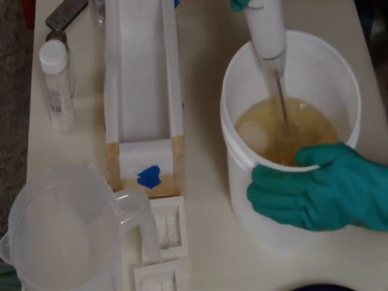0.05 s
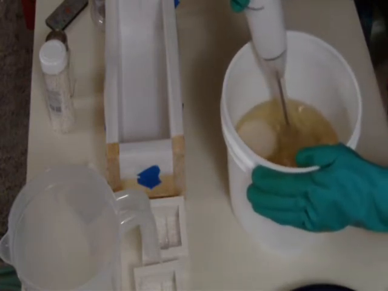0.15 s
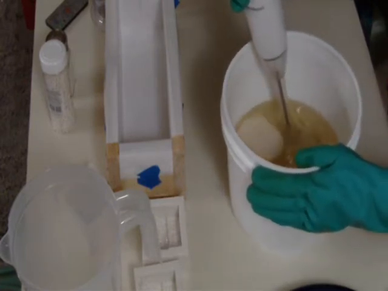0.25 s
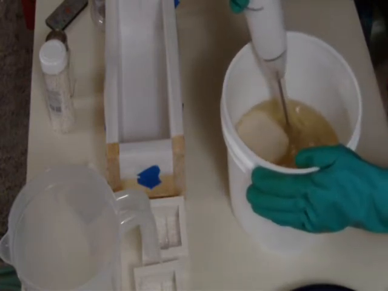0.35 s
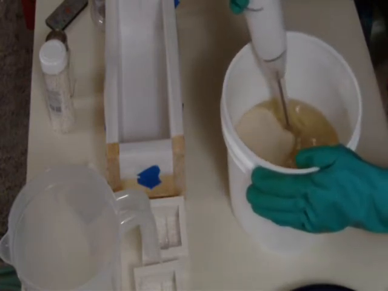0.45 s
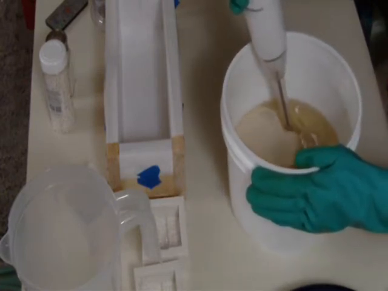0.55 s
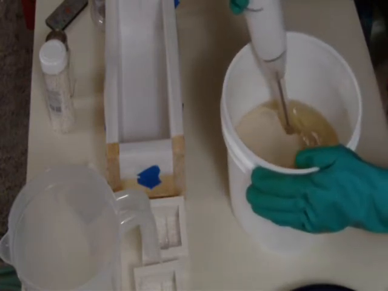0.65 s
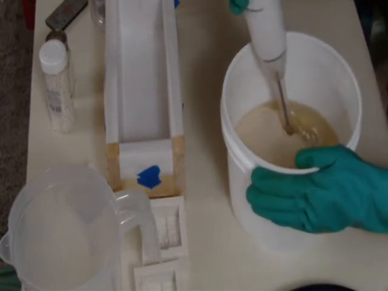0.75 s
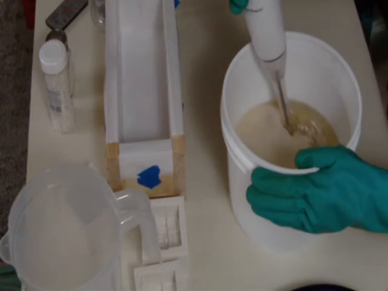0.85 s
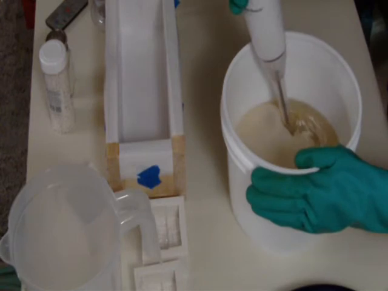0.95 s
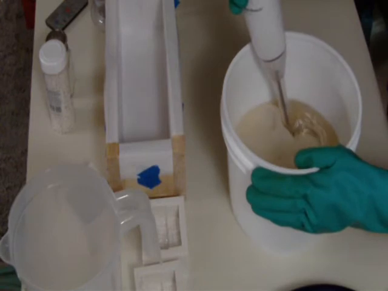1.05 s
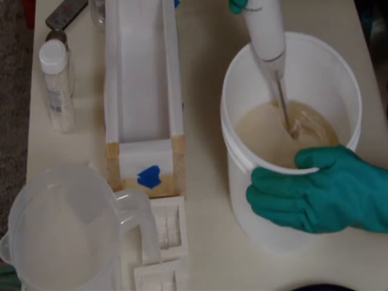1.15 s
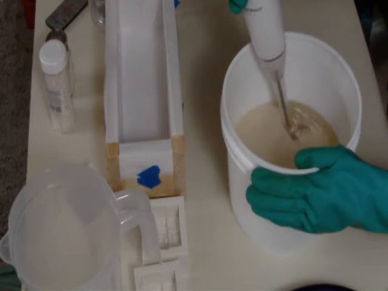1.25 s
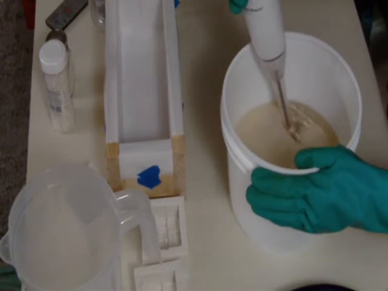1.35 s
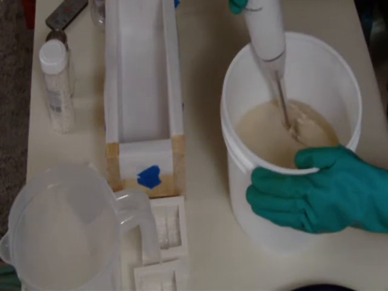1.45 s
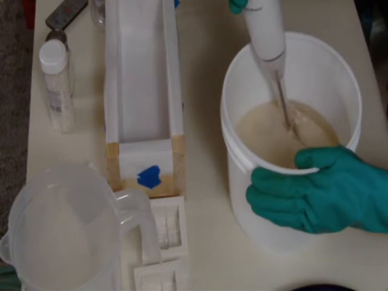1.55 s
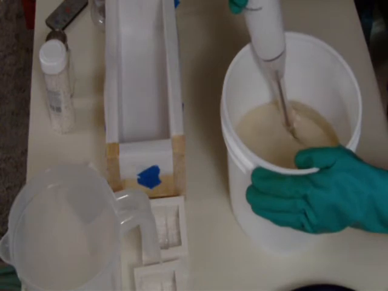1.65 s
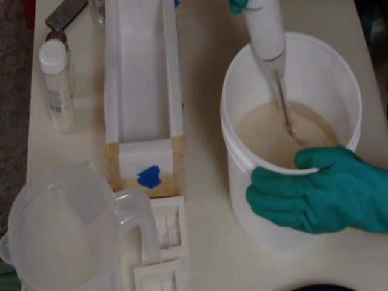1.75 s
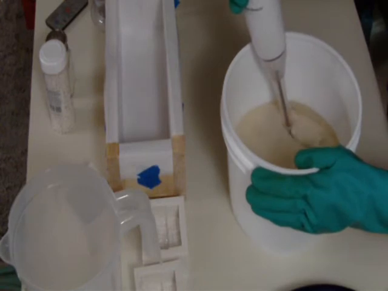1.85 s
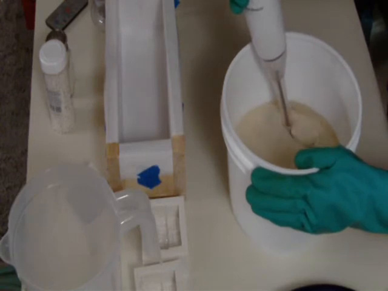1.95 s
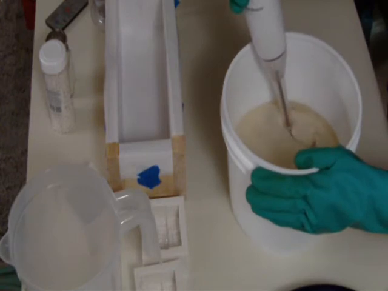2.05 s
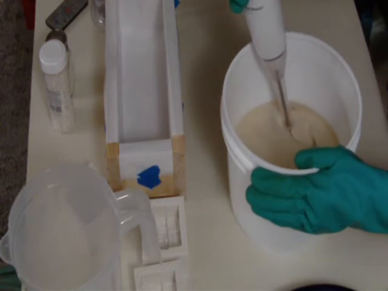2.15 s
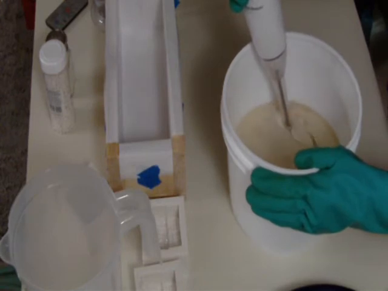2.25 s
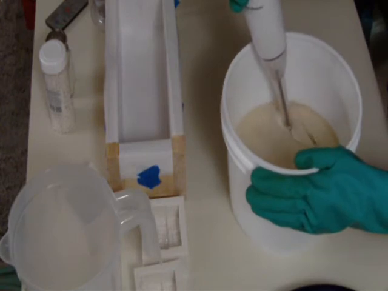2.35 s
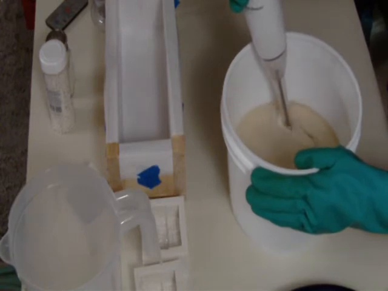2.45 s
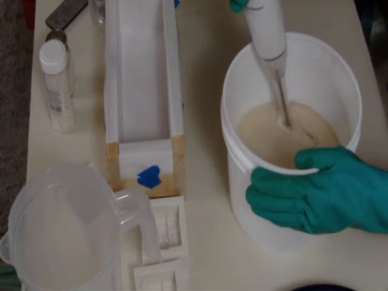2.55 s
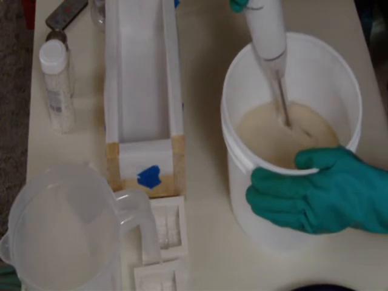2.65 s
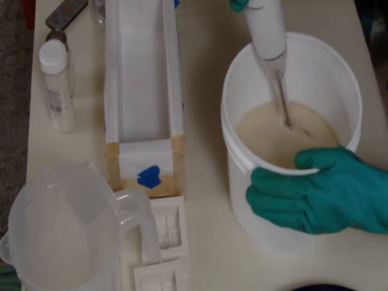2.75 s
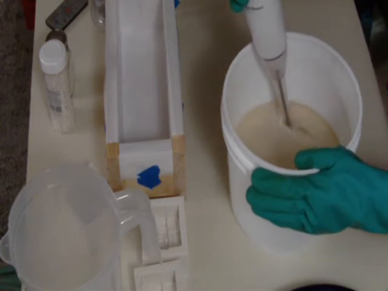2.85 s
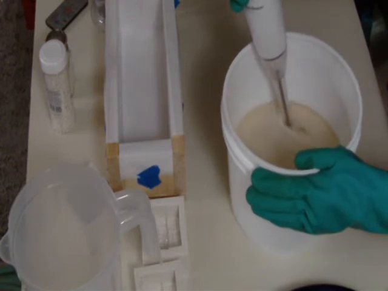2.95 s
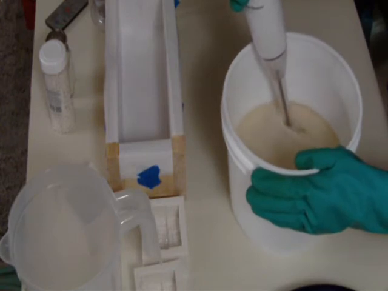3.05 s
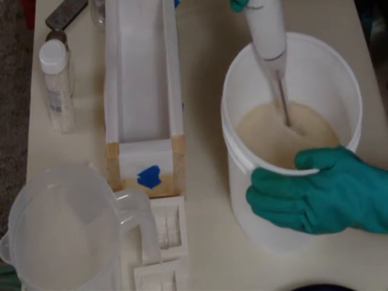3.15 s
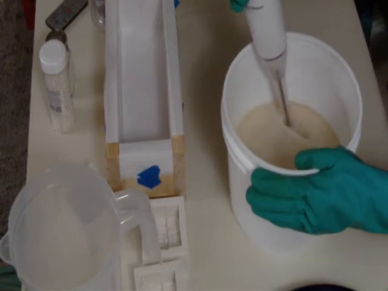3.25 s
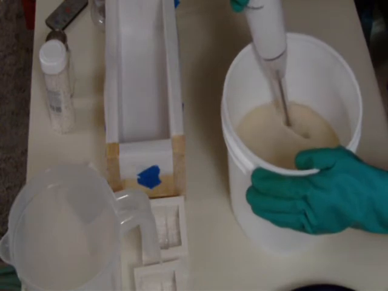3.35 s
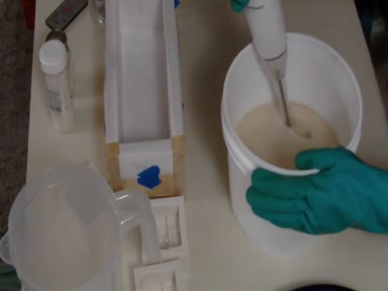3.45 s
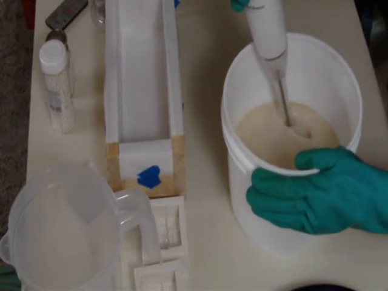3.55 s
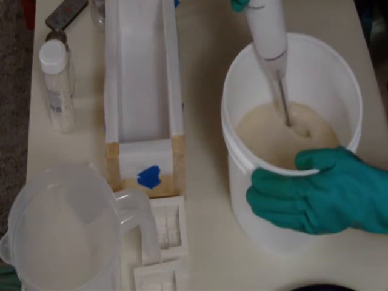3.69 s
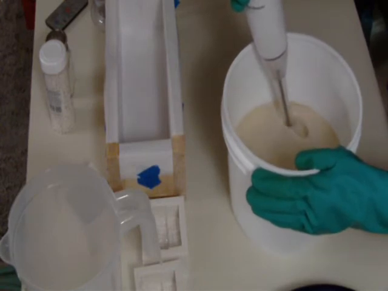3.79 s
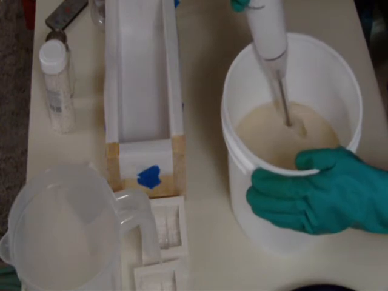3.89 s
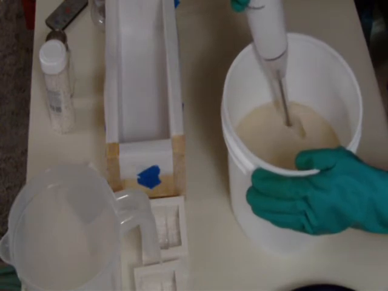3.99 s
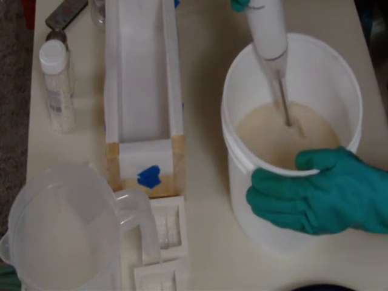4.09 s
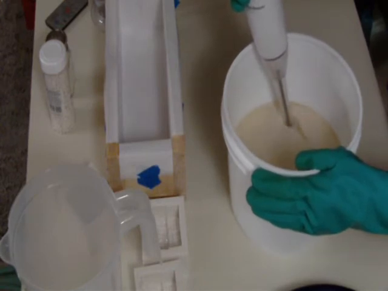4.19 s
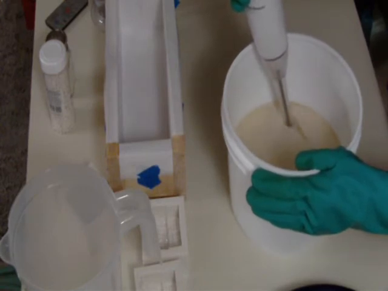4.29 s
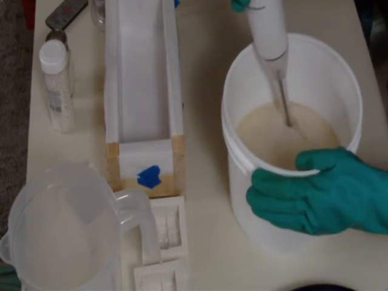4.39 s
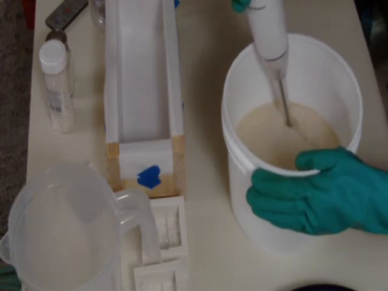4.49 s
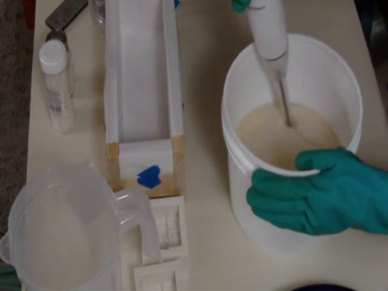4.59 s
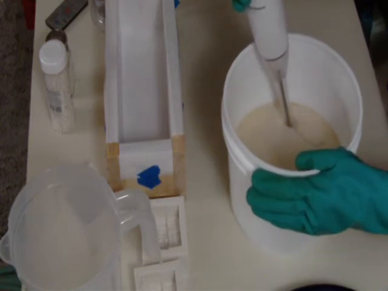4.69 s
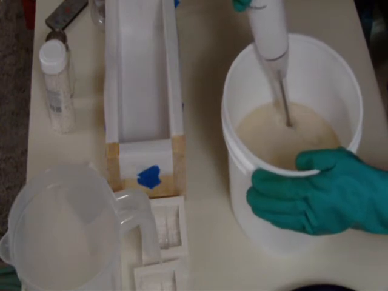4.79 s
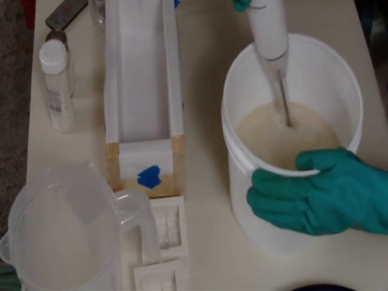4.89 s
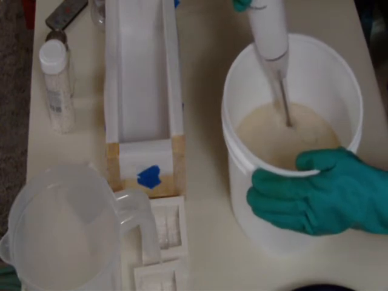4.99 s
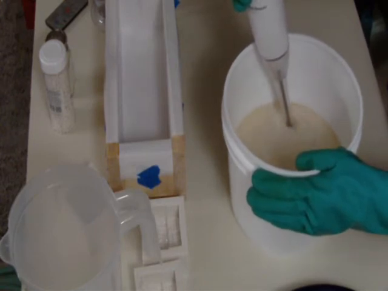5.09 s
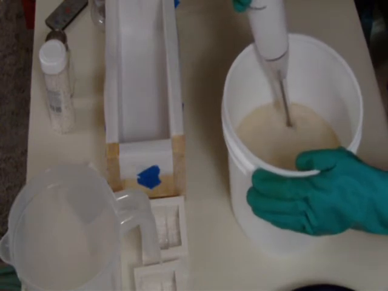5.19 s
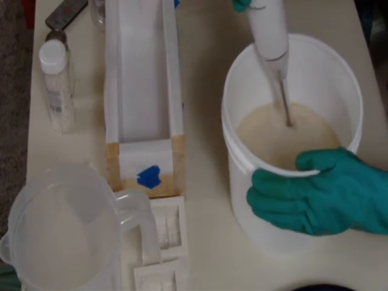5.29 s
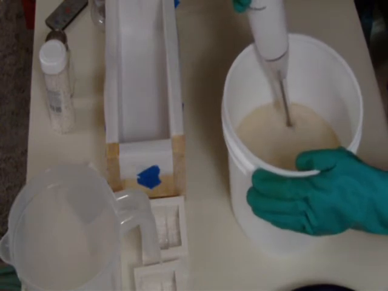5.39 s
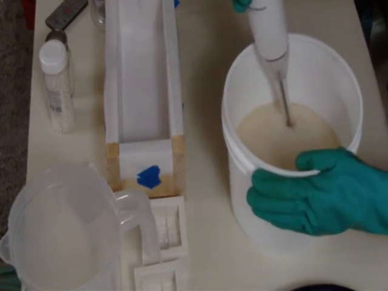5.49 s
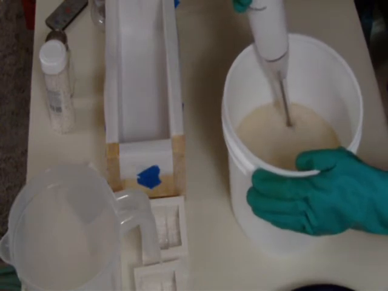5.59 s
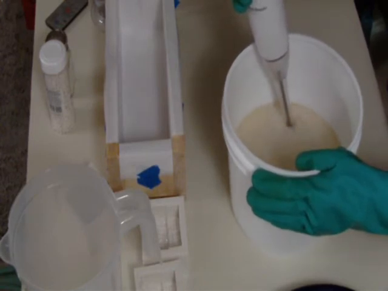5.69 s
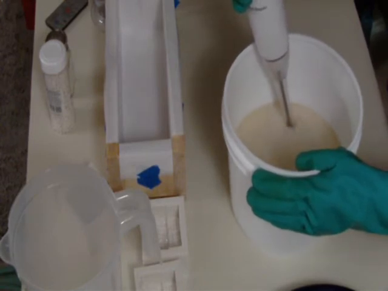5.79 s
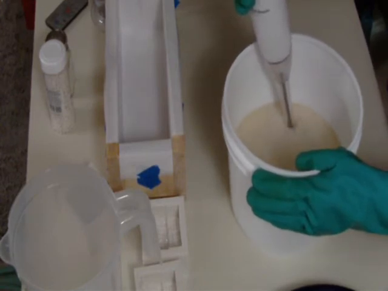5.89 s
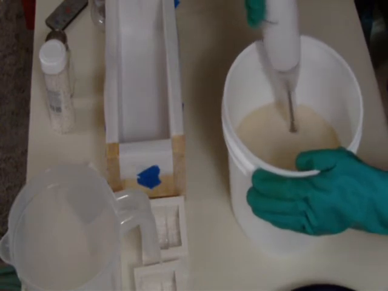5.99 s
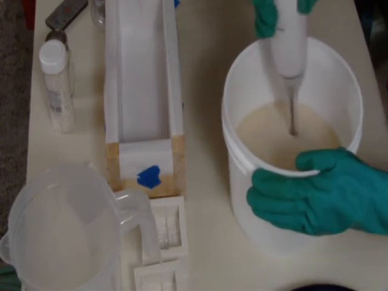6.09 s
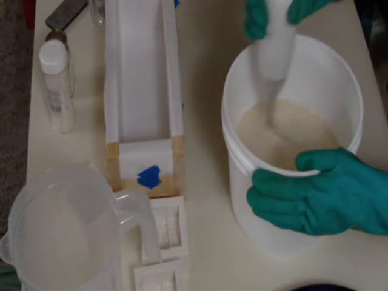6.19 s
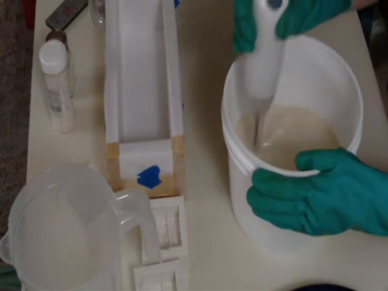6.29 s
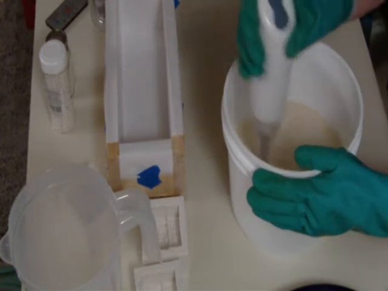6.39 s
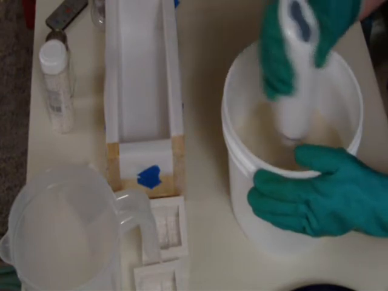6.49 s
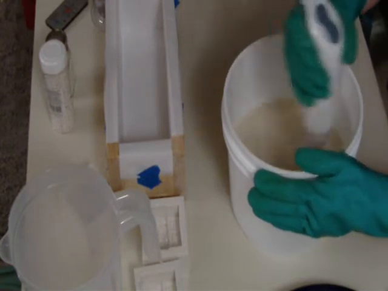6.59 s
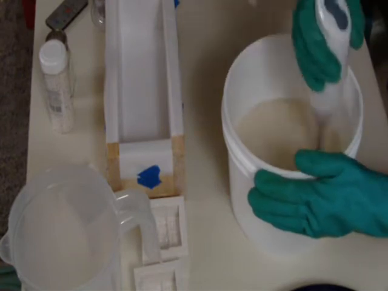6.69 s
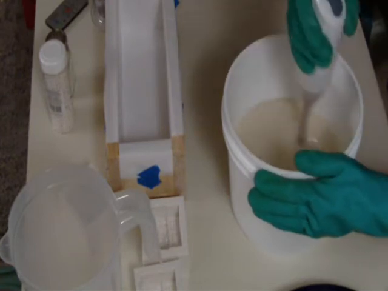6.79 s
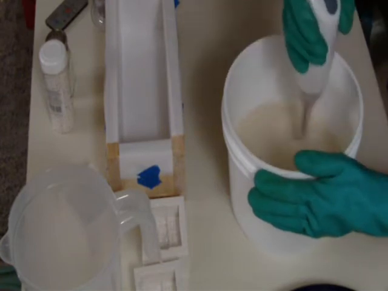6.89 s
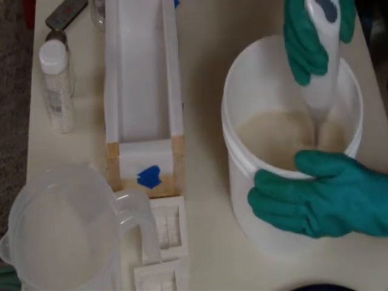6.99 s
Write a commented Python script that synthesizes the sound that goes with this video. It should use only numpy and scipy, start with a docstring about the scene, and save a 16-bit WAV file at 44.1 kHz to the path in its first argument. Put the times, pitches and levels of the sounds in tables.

```python
"""Stick blender in a bucket

A stick blender mixes oils in a plastic bucket on a workbench, in a small room; both channels are equal.
Mains pulses ripple the motor speed: the rotor hums on shaft orders, the commutator whines, the brushes hiss.
The churned liquid is random bubble bursts, coloured and passed through the bucket's resonances.
Switched off, the motor coasts to rest with a squeak; the head scrapes and knocks the bucket,
then stirs the batter by hand: soft swells of bubble noise.
"""
import sys
import numpy as np
from scipy import signal
from scipy.fft import rfft, irfft, next_fast_len
from scipy.io import wavfile
from scipy.ndimage import map_coordinates

SR = 44100
rng = np.random.default_rng(int(sys.argv[2]) if len(sys.argv) > 2 else 0)


def waveform_to_disk(signal):
    """Save audio, clipped to [-1, 1], as 16-bit WAV at the path in sys.argv[1]."""
    frames = np.transpose(np.atleast_2d(signal))
    scaled = np.clip(frames, -1, 1) * 32767
    samples = np.round(scaled).astype(np.int16)
    wavfile.write(sys.argv[1], SR, samples)


N = 310287
TIME = np.arange(N) / SR   # s
MAINS_HZ, CUTOFF_HZ = 60.02, 15650
# end of power, time constant of the drag, time from power off to standstill
SWITCH_OFF_S, DRAG_S, COAST_S = 5.762, .21, .53
# constant lapping of the batter under the strokes, relative levels
LAP_GURGLE_DB, LAP_FIZZ_DB = -48.5, -61

# room air colour: [freq_hz, density_db_per_hz]
ROOM_AIR_COLOUR = [(15, -54), (25, -32), (116, -17), (164, 8), (215, 4), (260, -2), (322, -3), (537, 12.5),
                   (1240, -20), (1530, -48), (2560, -19), (4620, -8), (15500, -19)]
# steady room hum: [freq_hz, level_db]
ROOM_HUM_TONES = [(172.3, -70), (263.8, -64), (7887, -82)]
# air and wall resonances of the bucket: [freq_hz, width_hz, lift_db]
BUCKET_MODES = [(579, 63, 8), (820, 79, 7), (1213, 93, 7.5), (2050, 210, 2.5), (2635, 50, 4.5)]
# bell-shaped blade guard resonances: [freq_hz, width_hz, lift_db]
GUARD_MODES = [(2310, 180, 6), (2560, 160, 8)]
# motor housing resonances: [freq_hz, width_hz, lift_db]
HOUSING_MODES = [(2330, 120, 13), (3920, 180, 13.5), (5460, 134, 8), (7030, 510, 10), (8740, 290, 10),
                 (9750, 350, 11.5), (10444, 140, 15.5), (14500, 220, 14.5)]
# bench and bucket ringing driven by the rotor: [freq_hz, width_hz, lift_db]
SUPPORT_MODES = [(120, 13, 10.5), (304.2, 26, 13), (588.5, 49, 12)]
# idle head through the batter: [middle_s, length_s, relative_gurgle_db, relative_fizz_db]
STIR_STROKES = [(6.19, 0.12, -50, -49), (6.362, .15, -55, -54), (6.55, 0.15, -56, -53.5),
                (6.74, 0.09, -55, -47.5), (6.938, 0.066, -44.5, -52.5), (7.018, 0.063, -53, -56)]
# stirred batter colour: [freq_hz, density_db_per_hz]
FIZZ_COLOUR = [(700, -19), (1400, -19), (1900, 1), (2450, 1.5), (3000, -3), (4000, -11), (6000, -20.5),
               (9000, -28), (16000, -40)]
# guard along the bucket wall: [middle_s, length_s, level_db]
GUARD_SCRAPE = (6.16, .1, -48)
# blender head against the bucket: [start_s, relative_peak_db]
HEAD_KNOCKS = [(6.119, -37), (6.146, -28.5), (6.206, -42)]
# brush squeak near standstill: [middle_s, length_s, level_db]
BRUSH_SQUEAK = (6.058, .05, -49.5)
# brush hiss colour: [freq_hz, density_db_per_hz]
BRUSH_COLOUR = [(2500, -19), (4500, 2), (6600, 3), (7900, -5.5), (9700, 3), (10900, 5), (11400, -6),
                (12600, -2.5), (13500, -5), (15800, -24.5)]
# commutator overtone colour: [freq_hz, relative_level_db]
WHINE_COLOUR = [(600, -40), (1700, -13), (3500, -3), (4400, -4), (5300, -0.5), (6200, 0), (7200, -2),
                (7900, 8), (8900, 0), (10200, 2.5), (11200, -3), (12500, -4), (15800, -13)]
# vortex strength at the blade: [time_s, relative_gurgle_db, relative_spray_db]
VORTEX_LEVELS = [(0.0, -32, -34), (0.05, -36, -39.5), (0.09, -37, -36), (0.26, -35.5, -34),
                 (0.42, -38.5, -34.5), (0.57, -35, -33.5), (0.93, -39, -36.5), (2.47, -37.5, -34.5),
                 (3.25, -36.5, -32.5), (3.41, -34, -32.5), (3.68, -38, -34), (4.32, -34.5, -34.5),
                 (4.61, -37, -34), (5.33, -36.5, -32.5), (5.52, -36.5, -33), (5.75, -35, -33.5)]
# bubble gurgle colour: [freq_hz, density_db_per_hz]
GURGLE_COLOUR = [(40, -22), (150, -25.5), (320, -9), (470, -9), (700, -2), (1000, -1), (1400, -1),
                 (1900, -3), (3500, -35)]
# spray colour: [freq_hz, density_db_per_hz]
SPRAY_COLOUR = [(700, -25), (1300, -9.5), (1750, 1), (2300, -2), (3400, -3.5), (4100, -9.5), (5200, -14.5),
                (6200, -27), (8000, -23), (16000, -30)]
# mean rotor speed under power, sagging as the blade takes up load: [time_s, turns_per_s]
ROTOR_SPEED = [(0, 152.1), (.45, 149.9), (.8, 148.7), (1.2, 148), (1.9, 148.1), (2.6, 149.1), (3.6, 148.6),
               (4.2, 149.1), (5.7, 148.8)]
# shake passed to the bucket: [time_s, relative_twice_per_turn_db, relative_four_per_turn_db]
BUCKET_SHAKE = [(0.0, -35, -34), (0.06, -41.5, -56), (0.17, -39, -48), (0.32, -42.5, -40.5),
                (0.86, -46, -34), (1.76, -46, -35), (2.4, -42, -40), (3.89, -41, -40), (4.0, -40.5, -44.5),
                (4.47, -41, -43), (4.8, -41.5, -36), (5.03, -41, -40), (5.52, -42, -38), (5.75, -39, -40.5)]
# weaker rotor orders, before support resonances: [multiple_of_turn, relative_level_db]
ROTOR_ORDERS = [(1, -56.5), (3, -52.5), (5, -47), (6, -48.5), (7, -52), (8, -45.5), (9, -56), (10, -47),
                (12, -65.5), (14, -61), (16, -69), (18, -54)]
# torque tones one mains rate above an order: [multiple_of_turn, relative_level_db]
TORQUE_TONES = [(2, -62.5), (3, -56.5), (4, -53)]


def from_db(db):
    """Decibels to amplitude gain."""
    return 10 ** (np.asarray(db) / 20)


def rms_one(x):
    """Scale to rms 1."""
    return x / np.sqrt(np.mean(x ** 2) + 1e-20)


def in_time(rows):
    """Interpolate each column of a time table to every sample."""
    time_s, *columns = np.transpose(rows)
    return [np.interp(TIME, time_s, column) for column in columns]


def swell(middle_s, length_s):
    """Smooth rise and fall; length is the width at half height."""
    return 2 ** -np.minimum((2 * (TIME - middle_s) / length_s) ** 2, 60)


def white():
    """White noise."""
    return rng.standard_normal(N)


def coloured(x, spectrum):
    """Shape a noise by gains interpolated over log frequency; rms 1."""
    table_hz, table_db = np.transpose(spectrum)
    size = next_fast_len(N)
    bins_hz = np.maximum(np.arange(size // 2 + 1) * SR / size, 1)
    gain = from_db(np.interp(np.log(bins_hz), np.log(table_hz), table_db))
    return rms_one(irfft(rfft(x, size) * gain, size)[:N])


def drift(rate_hz):
    """Smooth random drift of rms 1, from two random points per 1/rate_hz."""
    coarse_s = TIME[::32]
    points = rng.standard_normal(4096)
    smooth = map_coordinates(points, [coarse_s * 2 * rate_hz], order=3, mode="wrap")
    return np.interp(TIME, coarse_s, rms_one(smooth))


def grains(per_s, spread_db):
    """Bubble bursts or slips: impulses of uneven size and either sign at random moments; rms 1."""
    sizes = from_db(spread_db * np.minimum(rng.exponential(1, N), 4)) * np.sign(white())
    return rms_one(sizes * (rng.random(N) < per_s / SR))


def resonance(x, hz, width_hz):
    """Two-pole resonance, gain about 1 at its peak."""
    radius = np.exp(-np.pi * width_hz / SR)
    zeros = np.array([1, 0, -1]) * (1 - radius * radius) / 2
    poles = [1, -2 * radius * np.cos(2 * np.pi * hz / SR), radius * radius]
    return signal.lfilter(zeros, poles, x + 1e-18)


def lifted(x, modes):
    """A body lifts its resonances out of whatever sounds in it."""
    return x + sum((from_db(lift_db) - 1) * resonance(x, hz, width_hz) for hz, width_hz, lift_db in modes)


def bucket(x):
    """Air and wall resonances colour sound made inside the bucket."""
    return lifted(x, BUCKET_MODES)


def room(x, wet_db, t60_s):
    """Direct sound plus dense reflections, a decaying noise tail of set energy."""
    t = TIME[:SR // 2]
    tail = rng.standard_normal(len(t)) * from_db(-60 * t / t60_s)
    tail *= t > .003
    reflections = signal.fftconvolve(x, tail / np.linalg.norm(tail))[:N]
    return x + from_db(wet_db) * reflections


def background(air_db=-60):
    """Soft coloured room air and hum tones whose levels drift."""
    hum = np.zeros(N)
    for hz, db in ROOM_HUM_TONES:
        hum += np.sqrt(2) * from_db(db) * (1 + 0.17 * drift(5.7)) * np.sin(2 * np.pi * hz * TIME)
    return hum + from_db(air_db) * coloured(white(), ROOM_AIR_COLOUR)


def stirring(gurgle_db=-5.0, fizz_db=-3.0):
    """The idle head drags through thick batter: bubble noise laps steadily and swells per stroke."""
    gurgle_gain, fizz_gain = from_db(LAP_GURGLE_DB), from_db(LAP_FIZZ_DB)
    for middle_s, length_s, stroke_gurgle_db, stroke_fizz_db in STIR_STROKES:
        stroke = swell(middle_s, length_s)
        gurgle_gain = gurgle_gain + from_db(stroke_gurgle_db) * stroke
        fizz_gain = fizz_gain + from_db(stroke_fizz_db) * stroke
    gurgle = rms_one(bucket(coloured(grains(2500, 2.0), GURGLE_COLOUR)))
    fizz = coloured(grains(3000, 1.7), FIZZ_COLOUR)
    batter = from_db(gurgle_db) * gurgle_gain * gurgle + from_db(fizz_db) * fizz_gain * fizz
    return batter * np.clip((TIME - SWITCH_OFF_S) / DRAG_S, 0, 1)


def scrape(slips_per_s=3000, spread_db=3.0):
    """The guard sticks and slips on the plastic; each slip rings it."""
    middle_s, length_s, level_db = GUARD_SCRAPE
    slips = grains(slips_per_s, spread_db)
    ringing = sum(from_db(db) * resonance(slips, hz, width_hz) for hz, width_hz, db in GUARD_MODES)
    return from_db(level_db) * swell(middle_s, length_s) * rms_one(ringing)


def knocks(level_db=-5.5, t60_s=0.048, low_hz=750, high_hz=3000, top_hz=4800):
    """Plastic meets plastic: short noise cracks, damped by the liquid, ring bucket and guard."""
    decay = np.zeros(N)
    for start_s, peak_db in HEAD_KNOCKS:
        age_s = TIME - start_s
        decay += from_db(peak_db - 60 * np.abs(age_s) / t60_s) * (age_s >= 0)
    band = signal.butter(1, [low_hz, high_hz], "band", fs=SR, output="sos")
    top = signal.butter(2, top_hz, fs=SR, output="sos")
    noise = rms_one(signal.sosfilt(top, signal.sosfilt(band, white())))
    return from_db(level_db) * lifted(bucket(decay * noise), GUARD_MODES)


def mains_angle():
    """Mains phase in radians; power ends at pi/3, within a positive half cycle."""
    return 2 * np.pi * MAINS_HZ * (TIME - SWITCH_OFF_S) + np.pi / 3


def rotation(ripple=0.029, skew=0.2, wander=0.00063):
    """Shaft angle and relative pace: mains pulses ripple the speed; drag and friction stop the coast."""
    speed_turns_per_s, = in_time(ROTOR_SPEED)
    coasted_s = np.clip(TIME - SWITCH_OFF_S, 0, COAST_S)
    friction = np.exp(-COAST_S / DRAG_S)
    pace = np.maximum(np.exp(-coasted_s / DRAG_S) - friction, 0) / (1 - friction)
    mains = mains_angle()
    kick = (np.sin(mains) + skew * np.sin(2 * mains)) * (TIME < SWITCH_OFF_S)
    unevenness = 1 + ripple * kick + wander * drift(15)
    turns = np.cumsum(speed_turns_per_s * pace * unevenness) / SR
    return 2 * np.pi * turns, pace


def load(pace, knee, fade):
    """Gain that holds while the shaft is above the knee pace, then falls as a power of pace."""
    return np.minimum(pace / knee, 1) ** fade


def squeak(hz=3950, width_hz=190):
    """Slowly sliding carbon sticks and slips, ringing one housing mode: noise twice through a resonance."""
    middle_s, length_s, level_db = BRUSH_SQUEAK
    ringing = resonance(resonance(white(), hz, width_hz), hz, width_hz)
    return from_db(level_db) * swell(middle_s, length_s) * rms_one(ringing)


def brushes(pace, hiss_db=-43.0, pulse_depth=0.059, fade=1.2):
    """Sliding carbon hisses, pulsing slightly at the mains rate and fading with pace."""
    pulse = 1 - pulse_depth * np.sin(mains_angle())
    return from_db(hiss_db) * coloured(white(), BRUSH_COLOUR) * pulse * pace ** fade


def commutator(angle, pace, whine_db=-42.0, uneven=0.61, rough=0.12, fade=0.087,
               soften_db=14, rolloff_db_per_octave=7, stall=.13, bars=12):
    """Uneven bars pass the brushes; overtones sweep the housing modes and dull as they slow."""
    bar_hz = bars * pace * ROTOR_SPEED[-1][1]
    colour_hz, colour_db = np.transpose(WHINE_COLOUR)
    whine = np.zeros(N)
    for k in range(1, 19):
        hz = k * bar_hz
        db = np.interp(hz, colour_hz, colour_db)
        db -= soften_db * (1 - pace) * hz / colour_hz[-1]
        # brush width smooths away overtones above the sixth
        db -= rolloff_db_per_octave * max(np.log2(k / 6), 0)
        strength = 1 + uneven * np.cos(angle + rng.uniform(0, 2 * np.pi)) + rough * drift(130)
        whine += from_db(db) * strength * np.sin(k * bars * angle) * (hz < SR / 2)
    whine = rms_one(lifted(whine, HOUSING_MODES))
    return from_db(whine_db) * whine * pace ** fade * load(pace, knee=stall, fade=1.5)


def churning(angle, pace, gurgle_db=-2.5, spray_db=0., once=0.058, twice=0.089, throb=0.065,
             surge_db=0.74, gulp_db=1.06):
    """The blade tears oil into bubbles, surging with turn, blade and mains; the vortex gulps at random."""
    gurgle_level_db, spray_level_db = in_time(VORTEX_LEVELS)
    mains = mains_angle()
    beat = 1 + once * np.cos(angle) + twice * np.cos(2 * angle)
    beat += throb * (np.sin(mains) + np.cos(angle - mains))
    gurgle = rms_one(bucket(coloured(grains(6500, 3.2) * beat, GURGLE_COLOUR)))
    spray = rms_one(bucket(coloured(grains(9000, 2.56) * beat, SPRAY_COLOUR)))
    liquid = from_db(gurgle_level_db + gurgle_db + gulp_db * drift(7)) * gurgle
    liquid += from_db(spray_level_db + spray_db) * spray
    # the vortex holds for a moment as the blade slows, then collapses
    return liquid * from_db(surge_db * drift(16)) * load(pace, knee=0.91, fade=3.2)


def rotor(angle, pace, twice_db=-14.0, four_db=-11.0, flutter=0.036, throb=0.052, coupling=0.88):
    """Unbalance and blade hum on shaft orders; the liquid unsettles the high ones most."""
    shake_twice_db, shake_four_db = in_time(BUCKET_SHAKE)
    hum = from_db(shake_twice_db + twice_db) * np.sin(2 * angle)
    hum += from_db(shake_four_db + four_db) * (1 + 0.08 * drift(13)) * np.sin(4 * angle)
    for multiple, db in ROTOR_ORDERS:
        own_angle = angle * multiple + rng.uniform(0, 2 * np.pi)
        # the third order reaches the bucket by the same path as the fourth
        level_db = db + coupling * (shake_four_db - np.mean(shake_four_db)) * (multiple == 3)
        steady = (1 + flutter * multiple * drift(7)) * np.sin(own_angle)
        unsteady = flutter * multiple * drift(14) * np.cos(own_angle)
        hum += from_db(level_db) * (steady + unsteady)
    # slowing orders sweep through the bench and bucket resonances
    hum = lifted(hum * load(pace, knee=0.89, fade=3.0), SUPPORT_MODES)
    # pulsing torque puts side tones one mains rate from every order
    mains = mains_angle()
    side = throb * hum * np.sin(mains)
    side += sum(from_db(db) * np.sin(k * angle + mains) for k, db in TORQUE_TONES)
    return np.sqrt(2) * (hum + side * (TIME < SWITCH_OFF_S))


def scene():
    """Blender and bucket in the room, the same in both channels."""
    angle, pace = rotation()
    mono = room(rotor(angle, pace), wet_db=-14, t60_s=0.64)
    motor = commutator(angle, pace) + brushes(pace) + squeak()
    mono += room(motor, wet_db=-7, t60_s=0.19)
    inside_bucket = churning(angle, pace) + stirring() + scrape() + knocks()
    mono += room(inside_bucket, wet_db=-10.0, t60_s=0.37)
    mono += background()
    return np.array([mono, mono])


def record(dry):
    """Cut the top steeply with an elliptic low-pass."""
    low_pass = signal.ellip(12, .1, 80, CUTOFF_HZ, fs=SR, output="sos")
    return signal.sosfilt(low_pass, dry)


dry = scene()
out = record(dry)
waveform_to_disk(out)
```